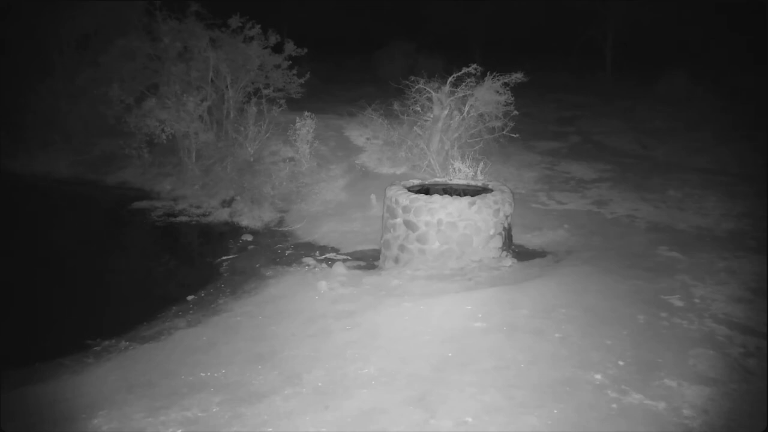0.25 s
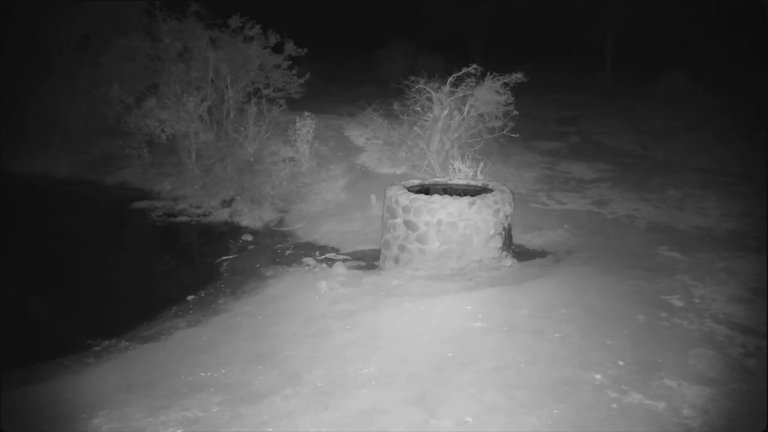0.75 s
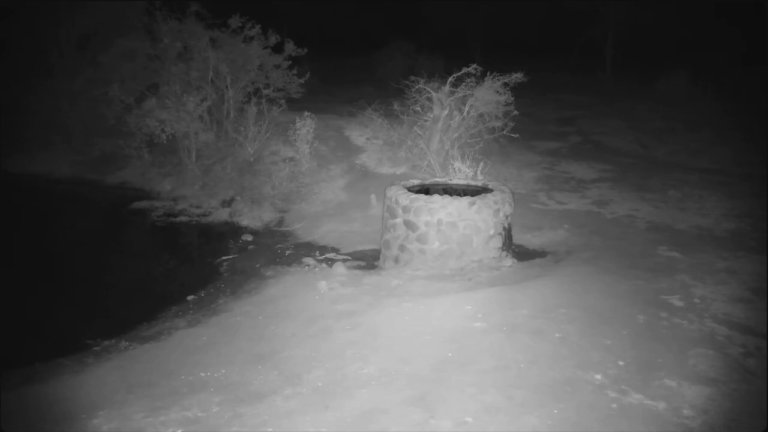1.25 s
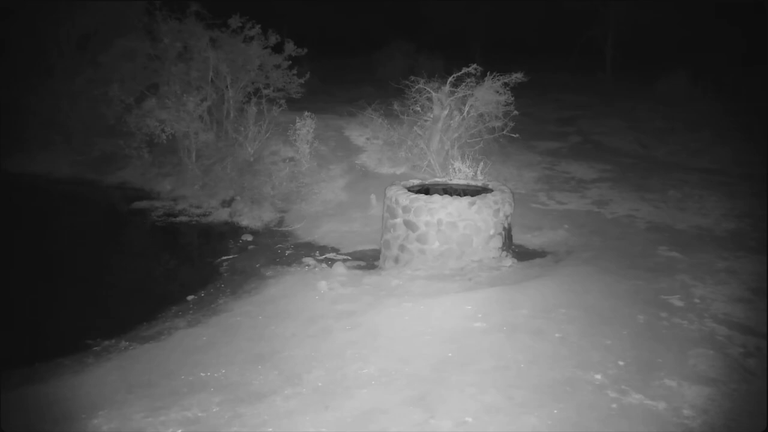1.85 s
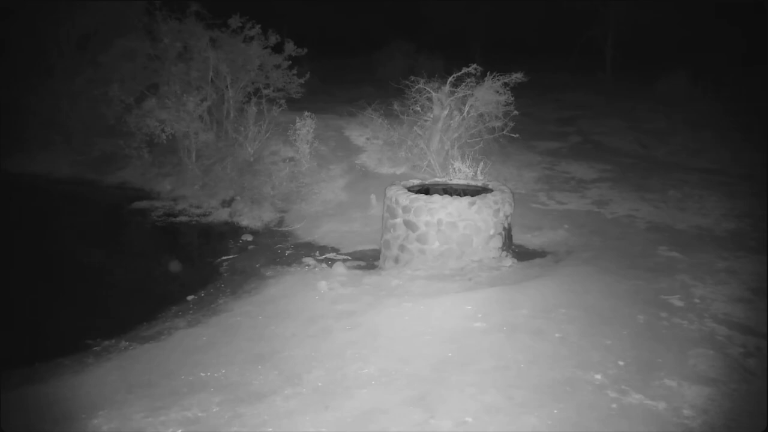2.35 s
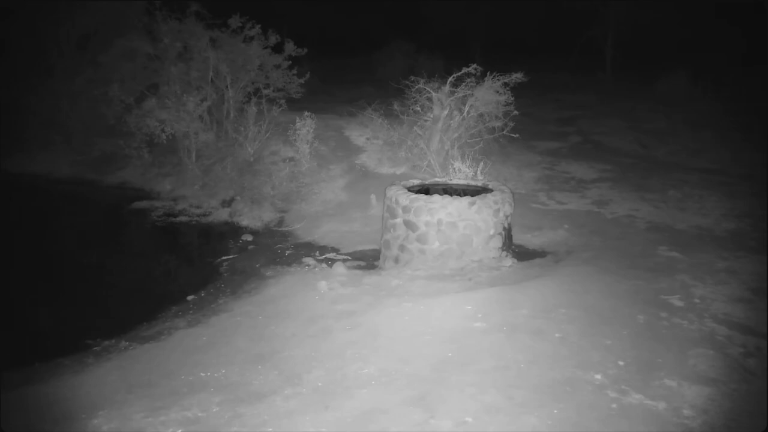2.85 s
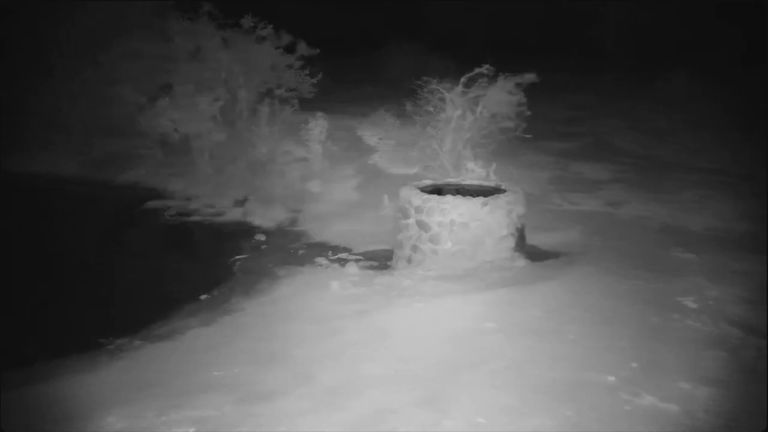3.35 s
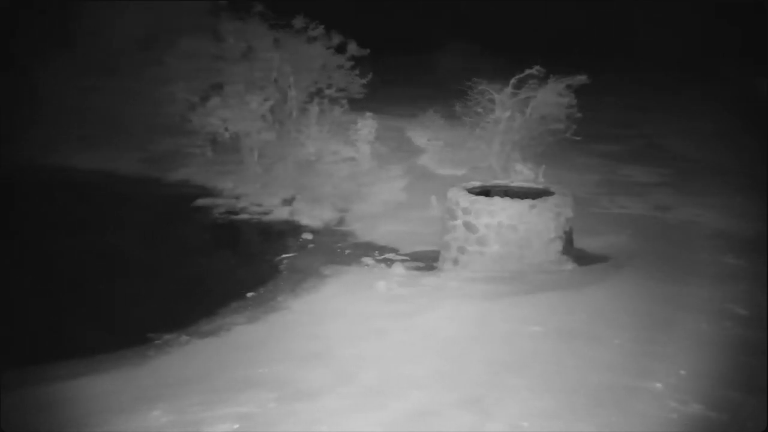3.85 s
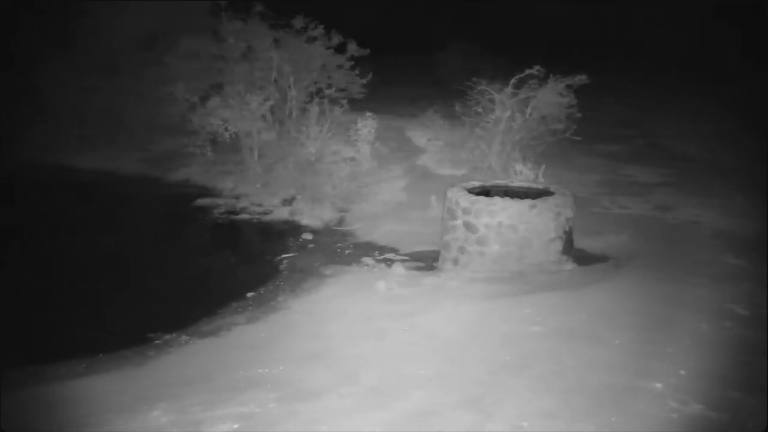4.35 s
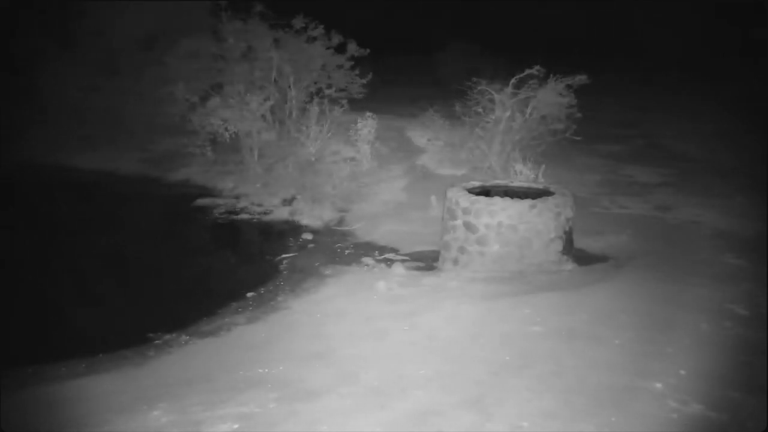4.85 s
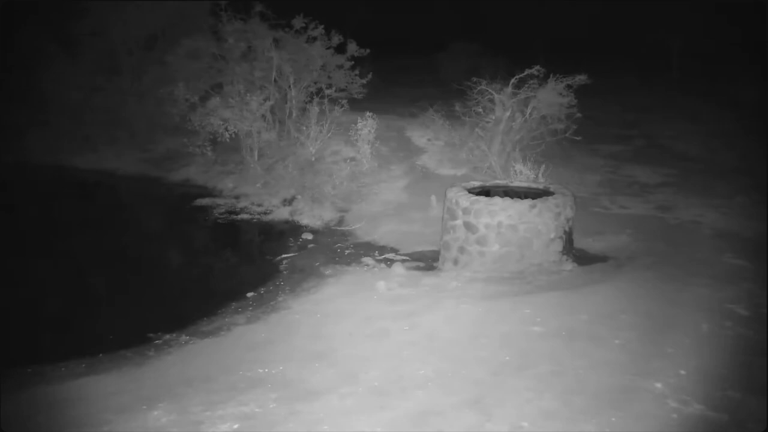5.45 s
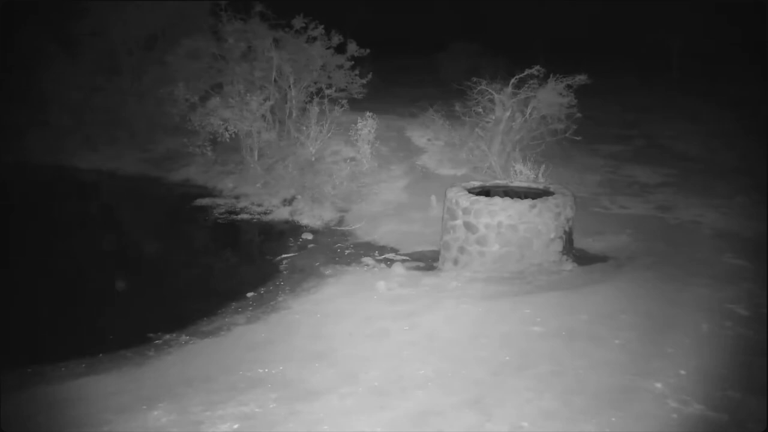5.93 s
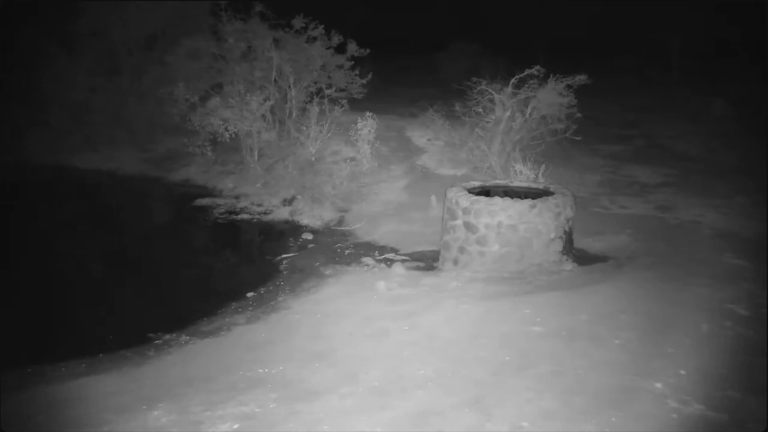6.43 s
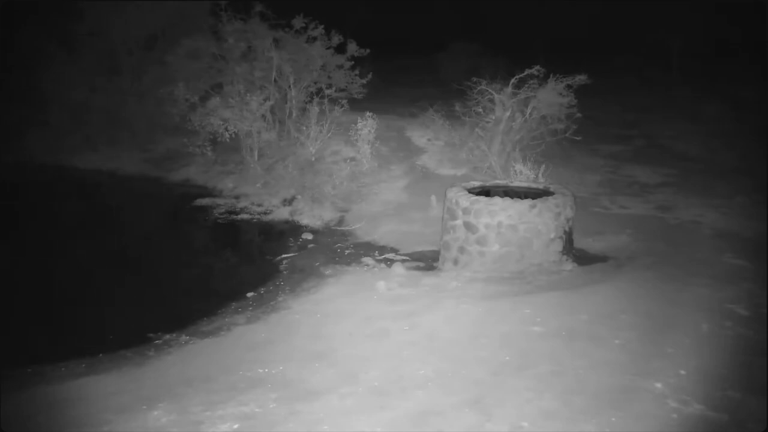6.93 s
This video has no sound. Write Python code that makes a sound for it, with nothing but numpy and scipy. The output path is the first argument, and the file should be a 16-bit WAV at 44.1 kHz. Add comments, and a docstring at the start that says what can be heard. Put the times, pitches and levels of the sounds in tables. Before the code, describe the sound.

Deep chesty lion grunts in turn, each swelling, cracking and sinking into a rasp, over distant moans and a faint night hiss.

```python
"""The end of a roar and a far moan, already under way, sink away in the open bush at night.
Two lions then roar in turn: a clean note swells, breaks, turns hoarse and sinks in pitch.
Each voice layers a chest note, a growl rung by the throat, a low rumble, a rasp and a hissing edge.
A far lion moans with a nearly pure tone; soft thuds are noise bursts through damped resonances.
One quick echo, thin, scattered echoes and a long, faint tail come back over a faint steady hiss."""
import sys
import numpy as np
from scipy import signal
from scipy.fft import rfft, irfft, next_fast_len
from scipy.io import wavfile
from scipy.ndimage import uniform_filter1d

SR = 44100
rng = np.random.default_rng(int(sys.argv[2]) if len(sys.argv) > 2 else 0)


def log_audio(samples):
    """Write samples as a 16-bit WAV file to the path given in sys.argv[1]."""
    # one column per channel
    frames = np.atleast_2d(samples).T
    # limit to full scale, then quantise
    limited = np.clip(frames, -1, 1)
    pcm = np.round(limited * 32767).astype(np.int16)
    wavfile.write(sys.argv[1], SR, pcm)


N = 317079


def from_db(db):
    """Decibels to gain."""
    return 10 ** (np.asarray(db) / 20)


def rms_one(x):
    """Scale to an rms of 1."""
    return x / np.sqrt(np.mean(x ** 2) + 1e-20)


def drift(corner_hz):
    """Smooth random wandering with a spread of 1, its faster motion filtered off above the corner."""
    step = 40  # samples between the points of the slow curve
    r = np.exp(-2 * np.pi * corner_hz * step / SR)
    noise = rng.standard_normal(N // step + 2002)
    slow = signal.lfilter([1], [1, -2 * r, r * r], noise)[2000:]  # drop the filter's settling
    return np.interp(np.arange(N) / step, np.arange(len(slow)), rms_one(slow))


def lag(x, time_s):
    """Follow a control sluggishly."""
    r = np.exp(-1 / (time_s * SR))
    return signal.lfilter([1 - r], [1, -r], x + 1e-18)


def colour(x, spectrum):
    """Filter by a gain curve joined on a log-frequency axis."""
    size = next_fast_len(len(x) + SR // 2)
    hz, db = np.transpose(spectrum)
    bins_hz = np.maximum(np.fft.rfftfreq(size, 1 / SR), 1)
    gain = from_db(np.interp(np.log(bins_hz), np.log(hz), db))
    return irfft(rfft(x, size) * gain, size)[:len(x)]


def even(x, window_s):
    """Hold the level steady over a window, keeping the faster grain."""
    size = max(int(window_s * SR), 2)
    power = uniform_filter1d(uniform_filter1d(x * x, size), size)
    return x / np.sqrt(np.abs(power) + 1e-12)


def resonate(x, hz, width_hz):
    """A resonance with a gain of 1 on top."""
    r = np.exp(-np.pi * width_hz / SR)
    zeros = np.array([1, 0, -1]) * (1 - r * r) / 2
    poles = [1, -2 * r * np.cos(2 * np.pi * hz / SR), r * r]
    return signal.lfilter(zeros, poles, x + 1e-18)


def cavity(x, modes):
    """Resonances side by side, each slightly widened and passed twice so that the valleys stay dark."""
    total = 0
    for hz, width_hz, db in modes:
        wide_hz = 1.034 * width_hz
        total = total + from_db(db) * resonate(resonate(x, hz, wide_hz), hz, wide_hz)
    return total


def moving_resonance(x, hz, width_hz):
    """A double resonance whose centre follows a curve: shift it down to zero, smooth, shift back."""
    turn = np.exp(2j * np.pi * np.cumsum(hz) / SR)
    r = np.exp(-np.pi * width_hz / SR)
    smooth = signal.lfilter([(1 - r) ** 2], [1, -2 * r, r * r], x / turn)
    return 2 * np.real(turn * smooth)


def calls(rows, fade_s):
    """For the current call: gate, share of rise to go, share of fall gone, time into fall, other columns."""
    t, rows = np.arange(N) / SR, np.array(rows)
    current = np.maximum(np.searchsorted(rows[:, 0] - fade_s, t) - 1, 0)
    start, rise, hold, fall, *columns = rows[current].T
    age = t - start
    since = age - rise - hold
    gate = np.clip(np.minimum(age, fall - since) / fade_s + .5, 0, 1)
    return gate, np.clip(1 - age / rise, 0, 1), np.clip(since / fall, 0, 1), since, columns


def arch(top_hz, end_hz, to_go, fallen, start_share, power):
    """Pitch climbs to its top, holds, and sags to its end."""
    climb_hz = top_hz * (1 - (1 - start_share) * to_go ** 2)
    return climb_hz + (end_hz - top_hz) * fallen ** power


def note(cycles, partials):
    """A strong fundamental and weak partials, all locked to the beat of the folds."""
    # partials fall on whole or half multiples
    weak = sum(from_db(db) * np.sin(np.pi * np.round(2 * k) * cycles) for k, db in partials)
    return np.sqrt(2) * (np.sin(2 * np.pi * cycles) + weak)


def airflow(cycles, rough, shimmer_db, noise_share, flutter_db):
    """Each closure of the folds gives an uneven pulse, among turbulence that may flutter with the cycle."""
    closures = np.diff(np.floor(cycles), prepend=0)
    puffs = rng.standard_normal(N) * from_db(flutter_db * np.cos(2 * np.pi * cycles))
    share = np.clip(noise_share, 0, 1)
    flow = np.sqrt(1 - share) * rms_one(closures) + np.sqrt(share) * rms_one(puffs)
    return flow * from_db(shimmer_db * rough * np.clip(drift(90), -2, 2))


# colour of the night hiss [hz, relative level_db]
NIGHT_COLOUR = [(20, -15.5), (70, -6), (115, -1), (160, 10.5), (230, -13), (380, -10.5), (550, -13),
                (750, -17.5), (1100, -17), (1500, -12.5), (2100, -17), (3000, -19), (12000, -19)]
NIGHT_DB = -61


def night_hiss():
    """Faint steady noise, shaped to the colour of the night."""
    return from_db(NIGHT_DB) * rms_one(colour(rng.standard_normal(N), NIGHT_COLOUR))


# what small things nearby scatter; long waves bend round them [hz, gain_db]
SHRUB_COLOUR = [(180, -30), (400, -7), (1200, 0), (3000, -1), (7000, -6)]
# colour of the far thickets' return [hz, gain_db]
THICKET_COLOUR = [(50, 4.5), (100, 6), (160, 2), (280, -2), (550, -12.5), (900, 7.5), (1500, 0), (2600, 3),
                  (6000, 0)]


def bush(x, early_db, early_t60, tail_db, tail_t60):
    """Near shrubs scatter quick echoes; the far thickets give a long, faint tail."""
    t = np.arange(2 * SR) / SR
    near = rng.standard_normal(len(t)) * from_db(-60 * t / early_t60)
    near = near * (rng.random(len(t)) < 600 / SR) * (t > .004)  # sparse: about 600 echoes a second
    far = rng.standard_normal(len(t)) * (t > .03) * from_db(-60 * t / tail_t60)
    early, tail = [signal.fftconvolve(x, rms_one(echoes) / np.sqrt(len(t)))[:N] for echoes in (near, far)]
    return from_db(early_db) * colour(early, SHRUB_COLOUR) + from_db(tail_db) * colour(tail, THICKET_COLOUR)


# one hard surface near the microphone, likely a stone trough: a single pair [delay_s, gain_db]
TROUGH_ECHO = (.0097, -14)


def trough_echo(x):
    """A hard surface throws back one quick echo, thin in the bass."""
    t, (delay_s, echo_db) = np.arange(N) / SR, TROUGH_ECHO
    return from_db(echo_db) * colour(np.interp(t - delay_s, t, x, left=0), SHRUB_COLOUR)


def air(x):
    """Distance takes away the highest treble."""
    return signal.sosfilt(signal.butter(6, 7000, fs=SR, output="sos"), x)


# soft thuds [start_s, level_db before the soft onset, click_db]
THUD_HITS = [(1.307, -39.5, -56), (2.408, -40.5, -57.5), (2.454, -46, -63), (4.367, -60.5, -78),
             (4.404, -49.5, -79), (5.656, -39.5, -56.5), (5.692, -53, -64), (6.46, -47, -72),
             (6.684, -60, -86)]
# what a thud rings with [hz, width_hz before cavity() widens it, relative level_db]
THUD_RINGS = [(227, 64, 4.5), (350, 210, -31.5), (530, 33, -15)]


def thuds(rise_s, t60, click_t60):
    """Short, soft noise bursts into a few damped modes, each with a faint click on top."""
    t, body, click = np.arange(N) / SR, np.zeros(N), np.zeros(N)
    for start_s, db, click_db in THUD_HITS:
        age = np.maximum(t - start_s, 0)
        body += from_db(db - 60 * age / t60) * (1 - np.exp(-age / rise_s))
        click += from_db(click_db - 60 * age / click_t60) * (t > start_s)
    noise = rng.standard_normal(N)
    tick = rms_one(colour(noise, [(400, -7.5), (1400, 1.0), (2500, -6), (5000, -17)]))
    return body * even(cavity(noise, THUD_RINGS), window_s=.015) + click * tick


# moans of the far lion [start_s, rise_s, hold_s, fall_s, top_pitch_hz, end_pitch_hz, level_db before waver]
FAR_MOANS = [ (-.12, .1, 0.019, .34, 190, 148, -28), (1.43, 0.18, 0.075, 0.2, 194, 170, -28.5),
             (3.055, .11, .07, .34, 154, 136, -34), (4.88, 0.072, .08, .31, 139, 123, -34.5), ]
# overtones of the far moan [multiple of the pitch, level_db below the fundamental]
MOAN_OVERTONES = [(2, -31.5), (3, -36.5)]
# colour of the rasp, near and far [hz, relative level_db]
RASP_COLOUR = [(450, -20.5), (650, -10), (800, -12), (1020, -5.5), (1170, -4.5), (1330, 5.5), (1480, -2.5),
               (1620, 5.5), (1850, -7.5), (2200, -4.5), (2430, -4.5), (2780, -8.5), (3100, -16.5),
               (6000, -44.5), (10000, -60.5)]
# a gentle arch: starting share of the top pitch, power of the sag, swell and fade
MOAN_START_SHARE, MOAN_POWER, MOAN_SWELL_DB, MOAN_FADE_DB = .78, 1.3, 15, 4
MOAN_WAVER_DB, MOAN_WAVER_HZ = 1.3, 14  # random waver of the level


def far_lion():
    """Distance leaves a nearly pure moan with a trace of hoarseness."""
    gate, to_go, fallen, _, (top_hz, end_hz, top_db) = calls(FAR_MOANS, fade_s=.03)
    pitch_hz = arch(top_hz, end_hz, to_go, fallen, MOAN_START_SHARE, MOAN_POWER)
    level_db = top_db - MOAN_SWELL_DB * to_go ** 2 - MOAN_FADE_DB * fallen ** 2
    cycles = np.cumsum(pitch_hz * (1 + 0.013 * drift(40))) / SR
    flow = airflow(cycles, 0.46, shimmer_db=5.0, noise_share=0.89, flutter_db=0.0)
    growl = rms_one(cavity(flow, [(200, 64, 9.0), (383, 30, 1), (606, 286, -14.5)]))
    rasp = rms_one(colour(flow, RASP_COLOUR))
    voice = note(cycles, MOAN_OVERTONES) + from_db(-16) * growl + from_db(-32.5) * rasp
    return gate * from_db(level_db + MOAN_WAVER_DB * drift(MOAN_WAVER_HZ)) * voice


# roars, levels before swell, throb and fade [lion, start_s, rise_s, hold_s, fall_s, top_pitch_hz, end_pitch_hz,
#   clean_note_db, hoarse_note_db, growl_db, rasp_db, fade_db over the fall, catch_db at the break]
ROAR_CALLS = [ ("leader", -.15, .06, .04, .21, 158, 104, -20, -26, -39, -49, 19, 5),
              ("companion", .345, .07, .12, .15, 167, 161, -15.5, -21.5, -34, -43, 4, 10),
              ("leader", .62, .045, .03, .2, 152, 118, -22.5, -22, -36, -47, 20, 4),
              ("companion", .765, .035, .04, .235, 162, 102, -20, -30, -39.5, -48.5, 19, 14),
              ("leader", 1.517, .095, .03, .26, 160, 117, -15.5, -22, -33.5, -43.5, 14, 4),
              ("companion", 1.835, .04, .02, .385, 163, 120, -20.5, -27, -40, -53, 24, 5),
              ("leader", 2.588, .095, .025, .28, 165, 116, -15, -22.5, -32.5, -43, 13, 4),
              ("companion", 2.85, .035, 0.023, .17, 160, 100, -20.5, -26, -39.5, -49.5, 18, 5),
              ("leader", 3.632, .095, .022, .225, 157, 112, -15, -24, -32.5, -43.5, 21, 20),
              ("companion", 4.485, .068, .015, .06, 159, 155, -26.5, -30, -40, -53.5, 2, 9),
              ("leader", 4.618, .055, .035, .24, 157, 117, -15.5, -23.5, -30.5, -40.5, 14, 6),
              ("companion", 5.32, .075, .025, .115, 157, 116, -28.5, -37, -41, -58, 22, 3),
              ("leader", 5.815, .1, 0.029, .25, 156, 106, -14.5, -28, -34.5, -41.5, 16, 2),
              ("companion", 6.15, .035, .02, .11, 171, 130, -28, -29.5, -41.5, -55, 7, 5),
              ("leader", 7.116, .07, .03, .25, 138, 108, -29, -29, -40.5, -50.5, 20, 5), ]
# a roar swells: starting share of its top pitch, and how far down each layer starts
START_PITCH_SHARE, NOTE_SWELL_DB, GROWL_SWELL_DB, RASP_SWELL_DB = .77, 23.5, 3, 5
# then the clean note breaks: the time it takes, and the spread of the catch in the voice
BREAK_S, CATCH_S = 0.039, .011
# as the lungs empty, pitch and levels sink by these powers of the fall's progress
PITCH_POWER, NOTE_POWER, GROWL_POWER, RASP_POWER = 1.1, 2.4, 2.05, 1.54
GROWL_FADE_SHARE, RASP_FADE_SHARE = 0.92, 0.95  # shares of the fade they take
THROB_DB, THROB_HZ = 1.8, 30  # the uneven push of the air: random throb of growl and rasp


def roaring(who):
    """One lion's gate, pitch and levels: each roar swells to a clean note, breaks, and dies away hoarsely."""
    rows = [row[1:] for row in ROAR_CALLS if row[0] == who]
    gate, to_go, fallen, since, columns = calls(rows, fade_s=0.017)
    top_hz, end_hz, clean_db, hoarse_db, growl_db, rasp_db, fade_db, catch_db = columns
    pitch_hz = arch(top_hz, end_hz, to_go, fallen, START_PITCH_SHARE, PITCH_POWER)
    broken = np.clip(since / BREAK_S, 0, 1)
    catch = np.exp(-.5 * ((since - BREAK_S) / CATCH_S) ** 2)
    note_db = clean_db + (hoarse_db - clean_db) * broken - catch_db * catch
    note_db = note_db - NOTE_SWELL_DB * to_go ** 1.19 - fade_db * fallen ** NOTE_POWER
    throb_db = THROB_DB * np.clip(drift(THROB_HZ), -2, 2)
    growl_fade_db = GROWL_FADE_SHARE * fade_db * fallen ** GROWL_POWER
    rasp_fade_db = RASP_FADE_SHARE * fade_db * fallen ** RASP_POWER
    return (gate, pitch_hz, note_db,
            growl_db + throb_db - GROWL_SWELL_DB * to_go - growl_fade_db,
            rasp_db + throb_db - RASP_SWELL_DB * to_go - rasp_fade_db)


# short, harsh surges in the rasp [lion, centre_s, level_db, spread_s of the bell]
RASP_SURGES = [ ("companion", .358, -43, 0.0029), ("leader", .735, -45, .015),
               ("companion", .81, -45, .015), ("leader", 1.7, -42, .004), ("companion", 1.875, -51, .015),
               ("companion", 2.125, -53, .03), ("leader", 2.62, -40, .004), ("leader", 2.78, -42, .012),
               ("leader", 2.875, -41, .006), ("leader", 3.66, -40, 0.0057), ("leader", 3.732, -40, 0.0057),
               ("leader", 3.806, -39, 0.013), ("leader", 3.905, -44.5, 0.0089),
               ("leader", 4.644, -38, 0.0028), ("leader", 4.755, -42, .007), ("leader", 4.822, -44, .012),
               ("leader", 4.878, -42.5, 0.0092), ("companion", 5.44, -50, .02),
               ("leader", 5.826, -42, 0.0046), ("leader", 5.975, -46, 0.0034), ("leader", 6.051, -38, .005),
               ("companion", 6.28, -52, 0.011), ]


def surge_gain(who):
    """Bell-shaped bursts of force from one lion."""
    t = np.arange(N) / SR
    return sum(from_db(db) * np.exp(-.5 * np.minimum(np.abs(t - centre_s) / spread_s, 10) ** 2)
               for caller, centre_s, db, spread_s in RASP_SURGES if caller == who)


# side partials of the chest note; half multiples come from strong and weak beats in turn
# [multiple of the pitch, level_db below the fundamental]
CHEST_PARTIALS = [(.5, -35.5), (1.5, -24), (2, -32.5), (2.5, -27)]
# low rumble under the growl [hz, relative level_db]
RUMBLE_COLOUR = [(15, -28), (42, -26), (67, -3), (92, -12), (140, 0), (195, 5), (290, -3), (450, -35)]
# bright edge of the blasts [hz, relative level_db]
EDGE_COLOUR = [(2000, -31), (3600, 7), (5000, 0), (6200, -8), (8000, -30.5), (12000, -46)]
# throat resonances of each lion, before lion() moves and widens them [hz, width_hz, relative level_db]
LEADER_RINGS = [(235.3, 116, 2.5), (357, 70, .5), (547, 22, 5)]
COMPANION_RINGS = [(230, 79, 1), (391.4, 65, 5.5), (531.3, 44.8, -9.5)]


def lion(who, throat, clean_db, hoarse_db, rumble_db, edge_db, jitter, throat_follow):
    """Heavy, loose vocal folds drive a chest note, a growl in the throat and a rasp in the mouth."""
    gate, pitch_hz, note_db, growl_db, rasp_db = roaring(who)
    # the folds lock into a regular beat on a strong note and flap irregularly on a weak one
    rough = .15 + 0.655 * np.clip((clean_db - note_db) / (clean_db - hoarse_db), 0, 1)
    cycles = np.cumsum(pitch_hz * (1 + jitter * rough * drift(70))) / SR
    chest = note(cycles, CHEST_PARTIALS) * from_db(note_db + 2.6 * rough * drift(35))
    flow = airflow(cycles, rough, shimmer_db=4.5, noise_share=0.93, flutter_db=0.5)
    # the larynx sinks with the pitch, lengthening the throat and lowering its resonances
    shortness = (lag(pitch_hz, 0.011) / 145) ** throat_follow
    rings = sum(from_db(db) * moving_resonance(flow, hz * shortness, 1.287 * width_hz)
                for hz, width_hz, db in throat)
    growl = even(rings, window_s=0.036) * from_db(growl_db)
    rumble = even(colour(flow, RUMBLE_COLOUR), window_s=0.025) * from_db(growl_db + rumble_db)
    # the slack edges of the folds slap at about half the rate, out of step
    slaps = np.cumsum(.5 * pitch_hz * (1 + .3 * drift(60))) / SR
    jet = airflow(slaps, rough, shimmer_db=3.5, noise_share=0.92, flutter_db=0.5)
    blast = gate * from_db(rasp_db) + surge_gain(who)
    rasp = even(colour(jet, RASP_COLOUR), window_s=0.23) * blast
    # the hissing edge builds a moment later, as the jaws open
    edge_gain = lag(blast, 0.021) * from_db(edge_db + 2.7 * drift(18))
    edge = even(colour(jet, EDGE_COLOUR), window_s=0.056) * edge_gain
    return gate * (chest + growl + rumble) + rasp + edge


def scene():
    """The lions and the thuds in the open, with their echoes, over the night's hiss."""
    leader = lion("leader", LEADER_RINGS, clean_db=-13.5, hoarse_db=-26.5,
                  rumble_db=-11, edge_db=-29.5, jitter=.055, throat_follow=0.2)
    companion = lion("companion", COMPANION_RINGS, clean_db=-16, hoarse_db=-29.0,
                     rumble_db=-12, edge_db=-26.5, jitter=.045, throat_follow=0.31)
    soft_thuds = thuds(rise_s=0.0031, t60=0.091, click_t60=0.14)
    sources = air(leader + companion + far_lion() + soft_thuds)
    echoes = bush(sources, early_db=-10.5, early_t60=0.37, tail_db=-21.5, tail_t60=1.53)
    return (sources + trough_echo(sources) + echoes + night_hiss())[None]


LOW_CUT_HZ, CUTOFF_HZ = 46, 12200


def record(dry):
    """The microphone loses the deepest bass; the top is cut steeply."""
    thinned = signal.sosfilt(signal.butter(2, LOW_CUT_HZ, "high", fs=SR, output="sos"), dry)
    return signal.sosfilt(signal.ellip(12, .1, 90, CUTOFF_HZ, fs=SR, output="sos"), thinned)


dry = scene()
out = record(dry)
log_audio(out)
```